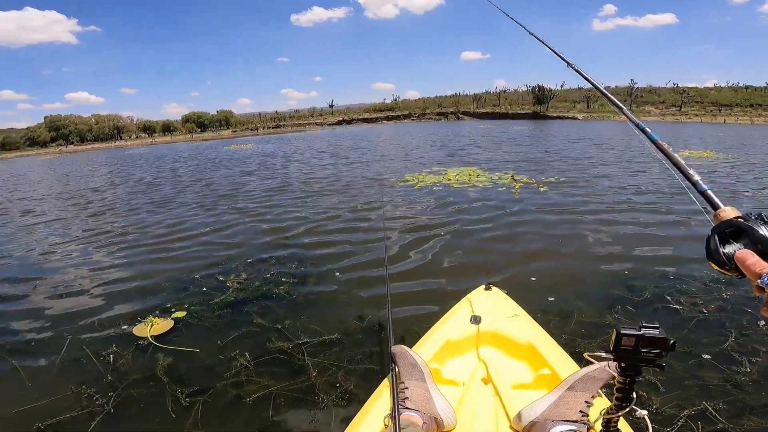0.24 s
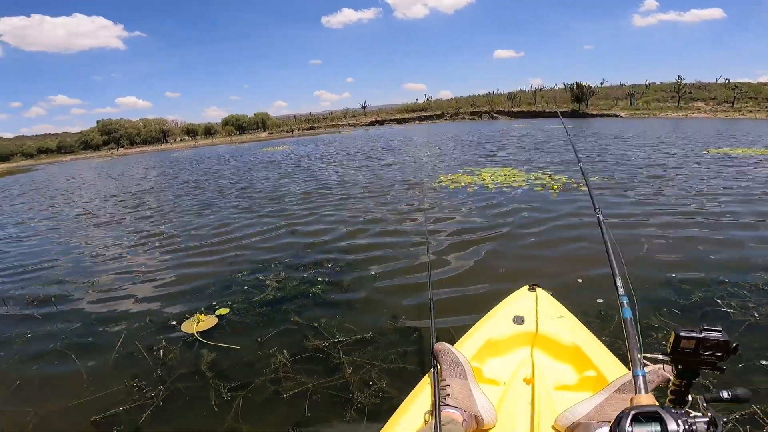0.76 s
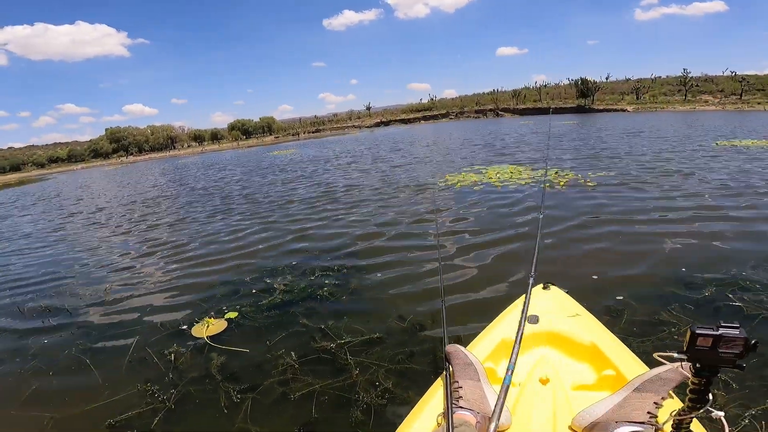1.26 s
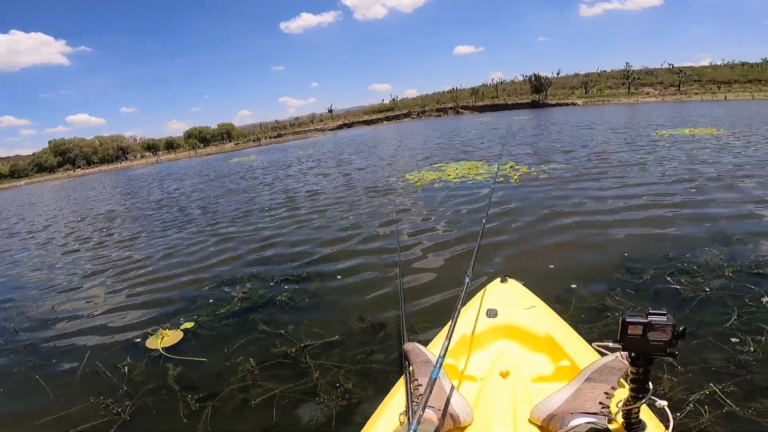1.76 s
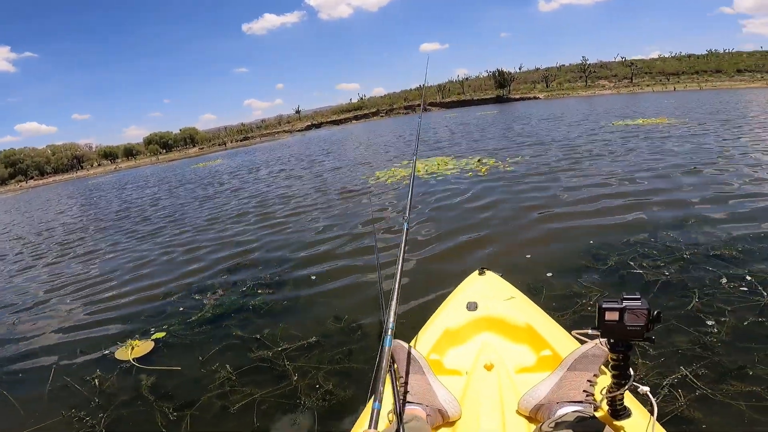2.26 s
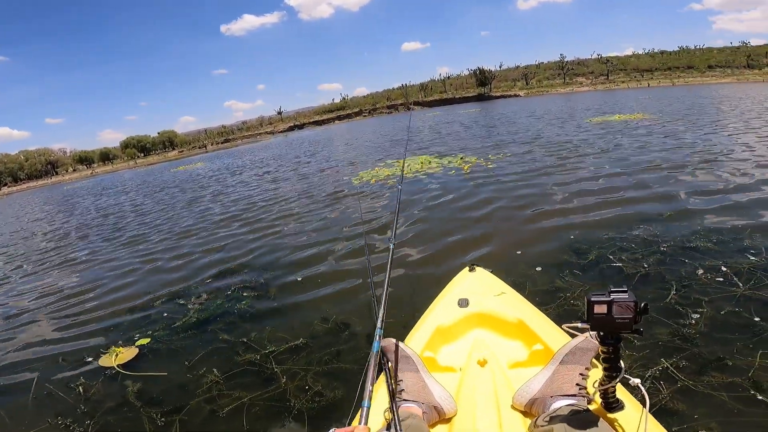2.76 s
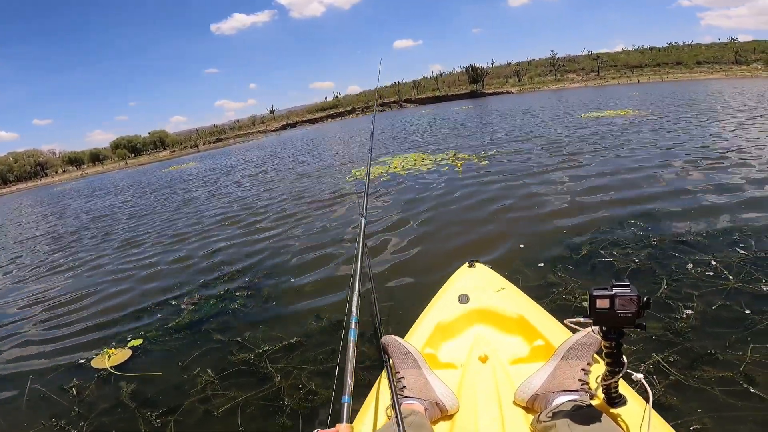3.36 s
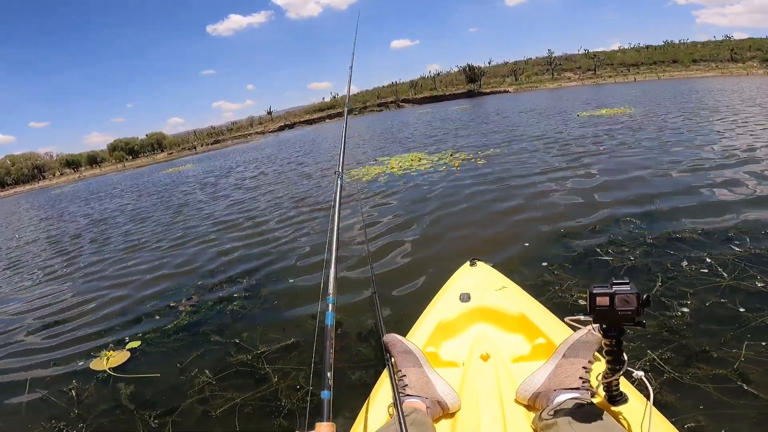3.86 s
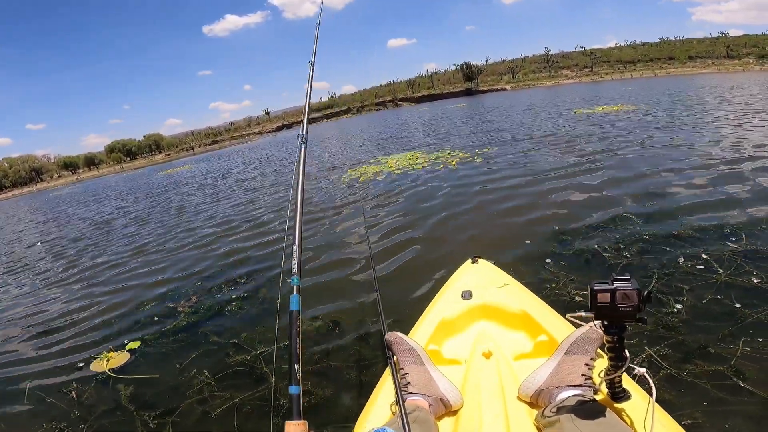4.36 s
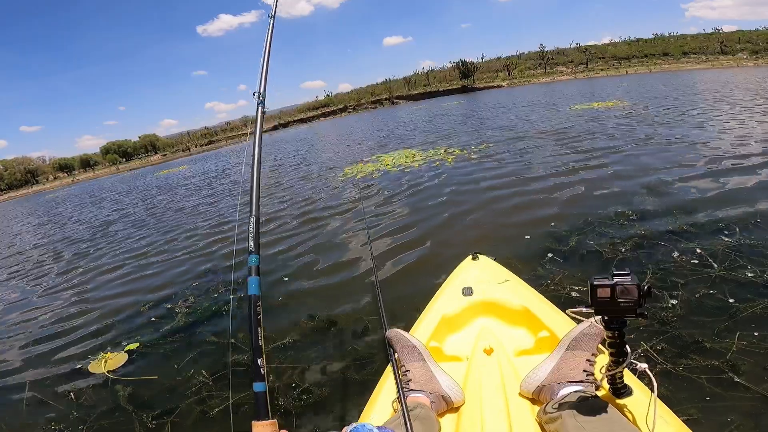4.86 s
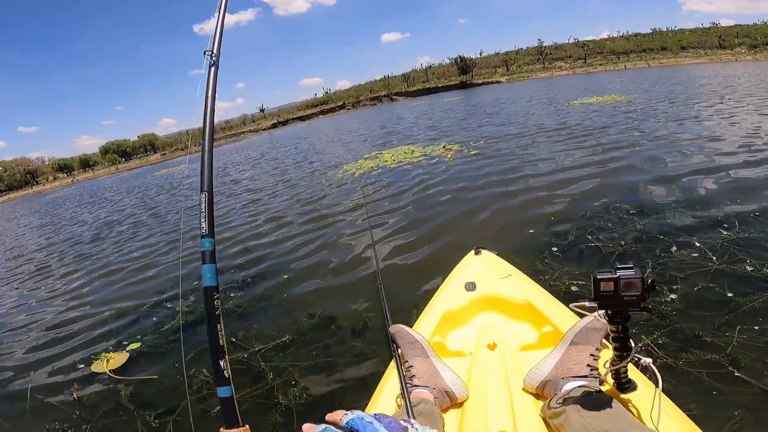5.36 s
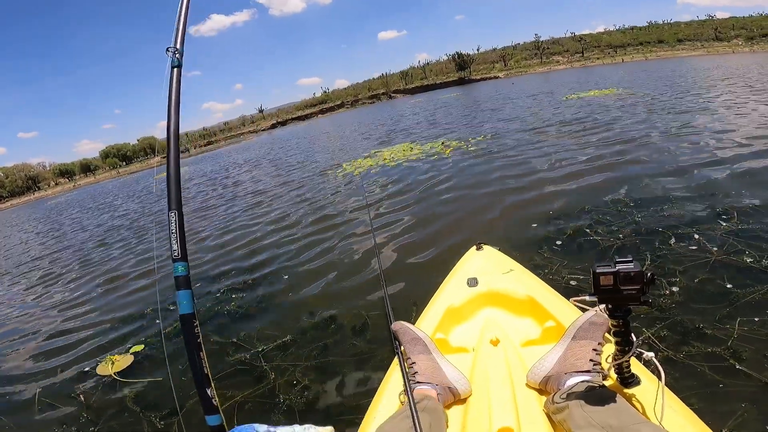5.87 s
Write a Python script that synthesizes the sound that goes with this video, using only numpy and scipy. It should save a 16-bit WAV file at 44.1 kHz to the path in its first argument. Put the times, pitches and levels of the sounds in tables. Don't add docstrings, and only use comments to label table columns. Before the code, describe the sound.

A small lure plops softly in water, then a fishing reel clacks hard twice, followed by low wind rumble and faint distant bird whistles.

```python
import sys
import numpy as np
from scipy import signal
from scipy.io import wavfile
from scipy.ndimage import uniform_filter1d

SR = 44100
rng = np.random.default_rng(int(sys.argv[2]) if len(sys.argv) > 2 else 0)


def natural_amplitude(level_db):
    exponent = np.asarray(level_db, float) / 20
    return 10 ** exponent


def output_pcm(signal):
    pcm = np.clip(np.atleast_2d(signal).T, -1, 1) * 32767
    wavfile.write(sys.argv[1], SR, np.round(pcm).astype(np.int16))


N = 269671


def band_passes(x, bands):
    out = 0
    for hz, width, db in bands:
        edges = [max(hz - width / 2, 5), min(hz + width / 2, SR / 2.2)]
        b, a = signal.butter(1, edges, "band", fs=SR)
        out = out + natural_amplitude(db) * signal.lfilter(b, a, x)
    return out


def steep_bands(x, bands):
    return band_passes(band_passes(x, bands), bands)


def band_noise(n, low_hz, high_hz, order):
    sos = signal.butter(order, [low_hz, high_hz], "band", fs=SR, output="sos")
    return signal.sosfilt(sos, rng.standard_normal(n))


def level(x, db):
    return x * natural_amplitude(db) / np.sqrt(np.mean(x ** 2))


def walk(rate):
    hold = int(SR / rate)
    steps = np.repeat(rng.standard_normal(N // hold + 1), hold)
    return 0.78 * uniform_filter1d(uniform_filter1d(steps, hold), hold)[:N]


def curve(table, col):
    rows = np.array(table, float)
    return np.interp(np.arange(N) / SR, rows[:, 0], rows[:, col])


def add(out, s, sound):
    i = int(s * SR)
    out[i:i + len(sound)] += sound[:N - i]


def decay(t, t60):
    return np.exp(-np.log(1000) * t / t60)


def ring(modes, t, weight_db, scatter_db):
    hz, db, t60 = np.array(modes, float).T[:, :, None]
    sign = (-1.) ** np.arange(len(modes))[:, None]
    gain = sign * natural_amplitude(db + weight_db + scatter_db * rng.standard_normal((len(modes), 1)))
    return (gain * decay(t, t60) * np.sin(2 * np.pi * hz * t)).sum(axis=0)


def whistle(out, table, wobble):
    s, hz, db = np.array(table, float).T
    t = np.arange(s[0], s[-1], 1 / SR)
    fade = np.clip(np.minimum(t - s[0], s[-1] - t) / 0.0017, 0, 1)
    drift = 1 + wobble * uniform_filter1d(rng.standard_normal(len(t)), 90)
    tone = np.sin(2 * np.pi * np.cumsum(np.interp(t, s, hz) * drift) / SR)
    add(out, s[0], np.sqrt(2) * natural_amplitude(np.interp(t, s, db)) * fade * tone)


# frequency in Hz, level in dB, t60 in seconds.
SNAP_MODES = [(4350, -9, .006), (5430, 0.5, 0.0061), (5899.8, -4, .008), (6480, 3, 0.0058),
              (7383, -2, 0.0064), (7780, 2.5, 0.0077), (8960, -1.5, 0.0041), (9280, -8.5, .008),
              (10800, -9.5, 0.006), (12490, -7, .006), (12800, -12, 0.00702), (15800, -16, .005)]
# frequency in Hz, level in dB, t60 in seconds.
FRAME_MODES = [(793.29, 1, .02), (1060, 0.5, .014), (687, -24.5, 0.12), (845.33, -15.5, 0.082),
               (1281, -24, 0.013), (480, -19, 0.035)]
# frequency in Hz, level in dB, t60 in seconds.
PLATE_MODES = [(2061.6, -1.5, 0.0094), (2790, -8.5, 0.015), (2422, -24, 0.05), (2650, -21, .048),
               (2890, -14, 0.046), (1802.7, -3, .009), (3800, -9, 0.0085)]


def strike(out, s, db, hz, spread, frame_db, plate_db, crack_db):
    t = np.arange(SR // 8) / SR
    octaves_off = np.log2(np.array(SNAP_MODES)[:, :1] / hz)
    reach_db = np.maximum(-6 * (octaves_off / max(spread, .05)) ** 2, -24 + 1.4 * crack_db)
    blow = ring(SNAP_MODES, t, reach_db, 0.43)
    blow += ring(FRAME_MODES, t, frame_db, 1.2) + ring(PLATE_MODES, t, plate_db, 1.5)
    noise = band_passes(rng.standard_normal(len(t)), [(6019.5, 11000, 0.0099)])
    noise = band_passes(noise, [(5940, 10000, 0.002)])
    crack = natural_amplitude(-7.5 + crack_db) * decay(t, t60=.007)
    tail = natural_amplitude(-24.5) * decay(t, t60=.035)
    blow += noise * (crack + tail)
    rattle = band_passes(rng.standard_normal(len(t)), [(2013, 2800, 0)])
    rattle = band_passes(rattle, [(2013, 2800, 5.5)])
    blow += rattle * natural_amplitude(plate_db - 13) * decay(t, t60=.03)
    add(out, s, natural_amplitude(db) * blow * np.minimum(t / 0.000088, 1))


# start in seconds, level in dB, snap centre in Hz,
# snap spread in octaves, frame level in dB.
RELEASE_BLOWS = [
    (1.481, -14, 6518, 0.4742, -13.5),
    (1.4830, 2.5, 7312, 0.49, -15),
    (1.4846, -3.5, 7010, .6, -9),
]
ENGAGE_BLOWS = [
    (2.7105, -13, 5590, .3, -0.5),
    (2.7120, -11, 6204, .3, -25.5),
    (2.7139, -2.5, 8050, .12, -53),
]
# start in seconds, level in dB, frame level in dB.
LOOSE_TICKS = [(1.4500, -37, -11.5), (1.4545, -38.5, -14), (1.4609, -24, -10.5), (1.4672, -33, -8.5),
               (1.4973, -31, -17), (1.5020, -37.5, -17.5), (1.5170, -44, -18), (1.8090, -56, -16),
               (2.3070, -60, -5), (2.5600, -50, -6.5), (2.6665, -41.5, -7), (2.6910, -38.5, -6),
               (2.732, -55, -9), (2.8110, -57.5, 5), (3.1780, -60, 7), (3.2830, -57, 9)]


def reel():
    out = np.zeros(N)
    for blow in RELEASE_BLOWS:
        strike(out, *blow, plate_db=-7, crack_db=1.5)
    for blow in ENGAGE_BLOWS:
        strike(out, *blow, plate_db=-12, crack_db=-4.5)
    for s, db, frame_db in LOOSE_TICKS:
        strike(out, s, db, 6565, 0.41, frame_db, plate_db=frame_db + 4.5, crack_db=0)
    return out


def bubble(out, s, db, hz):
    t = np.arange(SR // 10) / SR
    t60 = 0.028 * (hz / 1000) ** -0.49
    pitch = hz * 2 ** (0.0563 * np.minimum(t / t60, 1))
    attack = np.minimum(t / (0.0003 + .6 / hz), 1)
    add(out, s, natural_amplitude(db) * attack * decay(t, t60) * np.sin(2 * np.pi * np.cumsum(pitch) / SR))


def bubble_cloud(out, from_s, to_s, db, low_hz, octaves, count):
    for when, size, pitch in rng.random((count, 3)):
        bubble(out, from_s + when * (to_s - from_s), db - 8 * size, low_hz * 2 ** (octaves * pitch))


# start in seconds, peak in dB, main bubble in Hz, spray level in dB.
LURE_SLAPS = [
    (0.633, -39, 2170, -34.5),
    (.688, -30.5, 1255, -37.5),
    (.7035, -31, 4140, -35),
    (0.7191, -34, 2310, -33),
]
# pitch factor, level in dB.
TRAPPED_BUBBLES = [(.4, -7), (.62, -8), (1, 1.5), (1.75, -5)]


def splash(out):
    t = np.arange(SR // 50) / SR
    for s, db, hz, spray_db in LURE_SLAPS:
        spray = steep_bands(rng.standard_normal(len(t)), [(4788, 7000, 1.5)])
        add(out, s, natural_amplitude(spray_db) * decay(t, t60=.009) * np.minimum(t / .0008, 1) * spray)
        for factor, part_db in TRAPPED_BUBBLES:
            part_hz = hz * factor * (1 + 0.033 * rng.standard_normal())
            bubble(out, s + .002 * rng.random(), db + part_db, part_hz)


# start in seconds, peak in dB, frequency in Hz.
SINGLE_DROPS = [(.066, -46, 1580), (.176, -38.5, 1706), (.176, -40.5, 657.1), (.176, -50, 3520),
                (0.217, -46, 1290), (.863, -51, 6800), (.627, -37.5, 6470), (.659, -42.5, 6200),
                (.69, -37, 448), (.662, -43, 1280), (.672, -36.5, 2200), (.739, -50, 7500),
                (.776, -44.5, 6468), (.851, -46, 2380), (.851, -41, 900), (1.16, -47, 2836),
                (2.915, -52, 2500)]
# time in seconds, frequency in Hz, level in dB.
AIR_POCKET = [
    [(0.72, 331.1, -40), (0.726, 333.5, -39), (0.74, 327.7, -41.5), (0.748, 398.5, -47.5)],
    [(0.748, 394.7, -37.5), (0.76, 515.9, -36), (0.79, 1014, -34.5), (0.815, 1540, -77)],
]


def water():
    out = np.zeros(N)
    splash(out)
    for s, db, hz in SINGLE_DROPS:
        bubble(out, s, db, hz)
    bubble_cloud(out, .625, .735, db=-48.5, low_hz=1090, octaves=2.6, count=70)
    bubble_cloud(out, 0.0083, 0.45, db=-51, low_hz=800, octaves=1.4, count=60)
    whistle(out, [row for part in AIR_POCKET for row in part], 0.018)
    return out


# start in seconds, peak in dB, frequency in Hz.
HULL_KNOCKS = [
    (.205, -39.5, 370),
    (.580, -40, 385.2),
    (1.202, -38.5, 137),
    (1.241, -45.5, 412.4),
    (1.815, -40, 394),
    (2.069, -38, 258),
    (2.591, -44, 398.5),
]


def hull():
    out, t = np.zeros(N), np.arange(SR // 10) / SR
    for s, db, hz in HULL_KNOCKS:
        bubble(out, s, db, hz)
        thud = level(band_noise(len(t), .6 * hz, 1.9 * hz, order=3), 0)
        add(out, s, natural_amplitude(db - 7.5) * decay(t, t60=0.033) * np.minimum(t / 0.0024, 1) * thud)
    return out


# centre in Hz, width in Hz, level in dB.
HISS_BANDS = [(6900, 4200, 8), (11800, 5600, -12)]
# centre in Hz, width in Hz, level in dB.
SCUFF_BANDS = [(2500, 3300, 0)]
# start in seconds, length in seconds, hiss level in dB,
# scuff over hiss in dB.
ARM_MOVES = [(0, 0.054, -66.5, -1), (0.062, 1.3, -74.5, 1.5), (0.167, 0.052, -71.5, 4.5),
             (0.304, 0.26, -70, 0.5), (0.632, 0.028, -58.5, -2), (0.662, 0.06, -63, 6.5),
             (0.804, .38, -69.5, 3), (1.205, 0.088, -61, -2), (1.39, 0.13, -62.5, -4),
             (1.69, 0.044, -69, -11.5), (1.8, 0.25, -77, -3.5), (2.539, 0.054316, -67.5, -12),
             (2.6, 0.06313, -71.5, -9), (2.669, 0.02687, -62.5, -2), (2.785, .025, -68, -10.5),
             (3.149, .12, -77, 5), (3.47, 0.064, -73, 0), (4.7, 0.098, -76, -5.5), (5.551, 0.096, -71, 5),
             (5.668, 0.21, -70.5, 1.5), (5.898, 0.21, -78.5, 2.5)]


def rustle():
    grains = rng.standard_normal(N) * natural_amplitude(2.0 * rng.exponential(size=N) + 2.8 * walk(70))
    hiss = steep_bands(grains, HISS_BANDS)
    scuff = steep_bands(grains[::-1], SCUFF_BANDS)
    t = np.arange(N) / SR
    hiss_db = scuff_db = -83.5
    for s, length, db, over_db in ARM_MOVES:
        swell_db, fade_db = 304 * (s - t), 249 * (t - s - length)
        move_db = db - np.maximum(0, np.maximum(swell_db, fade_db))
        hiss_db = np.maximum(hiss_db, move_db)
        scuff_db = np.maximum(scuff_db, move_db + over_db)
    jerk_db = 1.9 * walk(20)
    return level(hiss, 2.3) * natural_amplitude(hiss_db + jerk_db) + level(scuff, 2.5) * natural_amplitude(scuff_db + jerk_db)


# share of its length, pitch from 0 = held note to 1 = top, level in dB.
SONG_PHRASE = [(0, .5, -8), (.07, .9, -2.5), (.13, 1, -1), (.3, -.2, -6.5), (.45, -.12, -6.5), (.6, 0, -4),
               (.78, -.15, -7.5), (1, -0.46, -16.5)]
# start in seconds, length in seconds, top in Hz, held note in Hz, level in dB.
SONG_TIMES = [
    (3.52, .19, 5560, 4110, -64),
    (4.875, 0.14, 5400, 4400, -61),
    (5.886, 0.16, 5200, 4113, -53),
]
# start in seconds, length in seconds, from Hz, to Hz, level in dB.
BIRD_SLIDES = [(1.701, 0.038, 2538, 3990, -70), (2.398, 0.031, 3997, 5000, -74),
               (2.799, 0.1265, 4440, 3800, -71.5), (3.06, 0.088, 5280, 5663, -72),
               (3.17, .07, 5800, 6400, -71.5), (3.242, 0.029, 2849, 4300, -63.5),
               (3.238, .035, 3593, 5886, -72.5), (3.25, .015, 8200, 9910, -72),
               (3.315, 0.016, 4710, 4960, -72), (3.531, .021, 4550, 4820, -71.5),
               (3.84, .015, 3596, 3730, -72), (3.93, 0.04917, 3606, 3950, -71),
               (4.05, .022, 3495, 3760, -73), (4.428, .02, 5870, 6788, -69),
               (4.735, 0.03893, 5250, 4690, -69.5), (4.792, .06, 4540, 4350, -73),
               (4.47, .04, 5696, 5000, -73.5), (4.799, 0.031, 2940, 3900, -70),
               (5.28, 0.014, 3290, 2685, -63.5), (5.292, 0.0323, 2683, 4050, -60.5),
               (5.288, 0.02724, 3845, 5567, -74), (5.723, .04, 4350, 4376, -72),
               (6.031, 0.022, 4900, 5230, -72), (6.07, .018, 5000, 5220, -69.5)]
# first note in seconds, gap in seconds, level in dB, top in Hz, bottom in Hz, note in seconds.
FALLING_TRILL = (4.675, .027, -72, 7300, 5800, .016)


def birds():
    out = np.zeros(N)
    for s, length, top_hz, held_hz, db in SONG_TIMES:
        whistle(out, np.array(SONG_PHRASE) * [length, top_hz - held_hz, 1] + [s, held_hz, db], 0.072)
    for s, length, from_hz, to_hz, db in BIRD_SLIDES:
        ends_db = db - 2.5
        middle = (s + length / 2, (from_hz + to_hz) / 2, db)
        whistle(out, [(s, from_hz, ends_db), middle, (s + length, to_hz, ends_db)], 0.0973)
    first, gap, db, top_hz, low_hz, note = FALLING_TRILL
    for k in range(7):
        s = first + k * gap
        whistle(out, [(s, top_hz, db), (s + note, low_hz, db)], 0.05856)
    t = np.arange(SR // 8) / SR
    shore = level(rng.standard_normal(len(t)) * decay(t, 0.1253), -43.5)
    return out + signal.fftconvolve(out, shore)[:N]


# time in seconds, flutter level in dB.
WIND_STRENGTH = [(0, -50), (.25, -56), (.6, -54), (.85, -53.5), (1.15, -46), (1.5, -47.5), (1.9, -49),
                 (2.3, -52), (2.65, -51), (3.0, -48), (3.3, -50.5), (3.7, -51), (4.1, -52), (4.5, -54),
                 (5.2, -53), (5.6, -54.5), (6.11, -56)]
# time in seconds, peak in dB.
WIND_BUFFETS = [(.16, -34), (.55, -31), (1.25, -29.5), (1.4, -30.5), (1.81, -34), (2.03, -31.5),
                (2.43, -31), (2.66, -30), (2.78, -23.5), (2.9, -29.5), (3.2, -32), (3.86, -32), (4.38, -35),
                (5.35, -27), (5.52, -27.5), (5.66, -31), (5.78, -26.5), (5.96, -26)]


def wind():
    t, strength_db = np.arange(N) / SR, curve(WIND_STRENGTH, 1)
    deep = band_noise(N, 8, 27, order=2)
    deep = level(deep / np.sqrt(uniform_filter1d(deep ** 2, SR // 6)), 0)
    flutter = band_passes(rng.standard_normal(N), [(70, 36, 3.0), (112.19, 35, -9), (190, 62, -14.5)])
    flutter = signal.sosfilt(signal.butter(2, 230, fs=SR, output="sos"), flutter)
    flutter = flutter / np.sqrt(uniform_filter1d(flutter ** 2, SR // 5))
    flutter = level(flutter * natural_amplitude(4.1 * walk(8) + 1.5 * walk(3.5)), 0)
    buffet_s = 0.039
    push = sum(natural_amplitude(db) * np.exp(-.5 * ((t - s) / buffet_s) ** 2) for s, db in WIND_BUFFETS)
    steady = natural_amplitude(-37 + .4 * (strength_db - strength_db.mean()))
    return deep * np.maximum(push, steady) + flutter * natural_amplitude(strength_db - 0.5)


# frequency in Hz, level in dB per Hz.
AIR_SPECTRUM = [(160, 2.5), (250, -10.5), (400, 0), (630, -1), (820, 2.5), (1000, -7), (1300, -11),
                (2000, -14.5), (2800, -14.5), (4000, -16.5), (6500, -17), (10000, -21.5), (15000, -24)]


def air():
    out, swell = 0, walk(0.65)
    hz_table, db_table = np.array(AIR_SPECTRUM).T
    for hz in 160 * 2 ** np.arange(0, 6.7, 1 / 3):
        db = np.interp(np.log(hz), np.log(hz_table), db_table) + 0.7 * swell + 1.1 * walk(11)
        out = out + natural_amplitude(db) * band_noise(N, hz * .89, hz * 1.12, order=2)
    return level(out, -61)


def scene():
    return (reel() + water() + hull() + rustle() + birds() + wind() + air())[None]


def top_cut(x):
    return signal.sosfilt(signal.butter(12, 15280, fs=SR, output="sos"), x)


def record(dry):
    duck_db, duck_s = -6, .25
    last_over = np.maximum.accumulate(np.where(np.abs(dry[0]) > 1, np.arange(N), -N))
    since = (np.arange(N) - last_over) / SR
    gain_db = duck_db * np.exp(-since / duck_s) * np.clip(since / .01, 0, 1)
    return top_cut(np.clip(dry * natural_amplitude(gain_db), -1, 1))


dry = scene()
out = record(dry)
output_pcm(out)
```